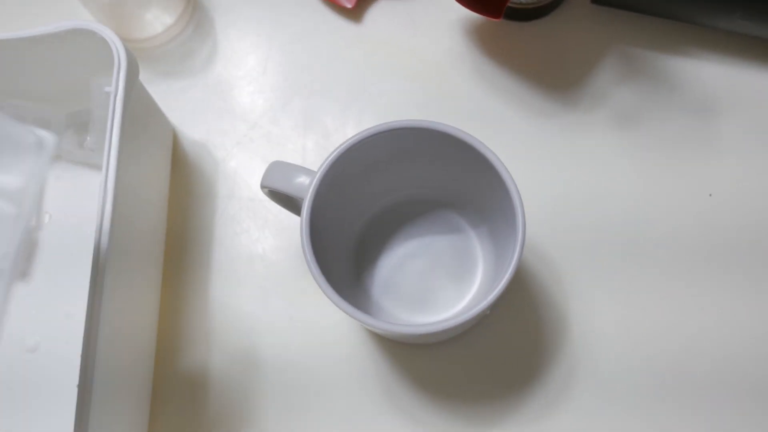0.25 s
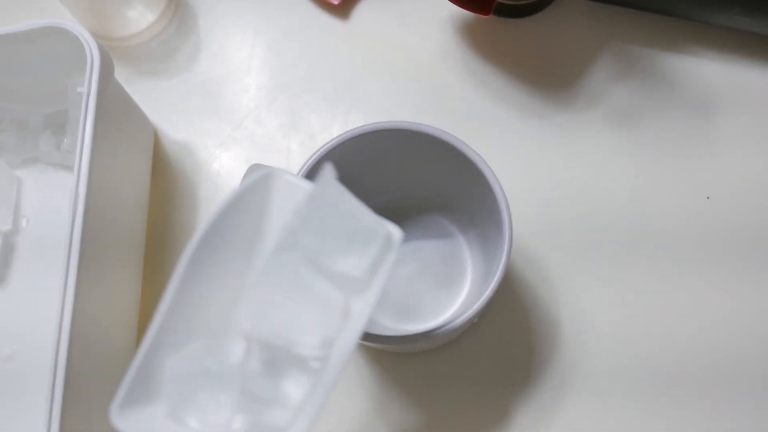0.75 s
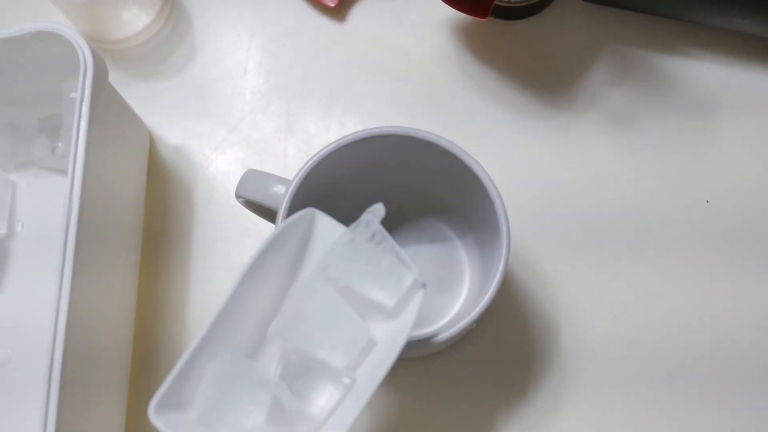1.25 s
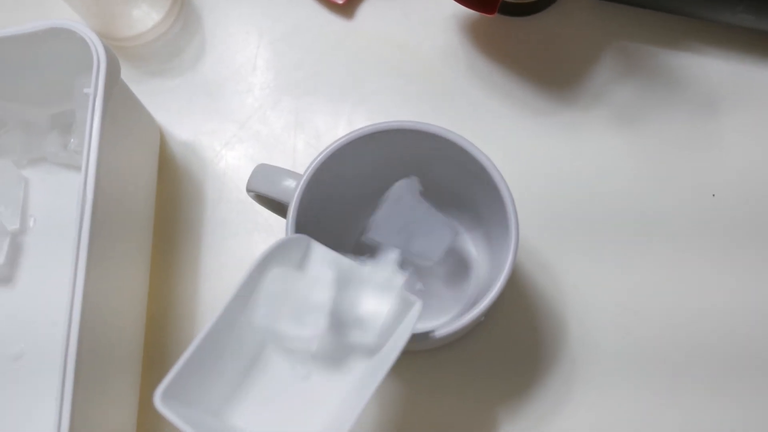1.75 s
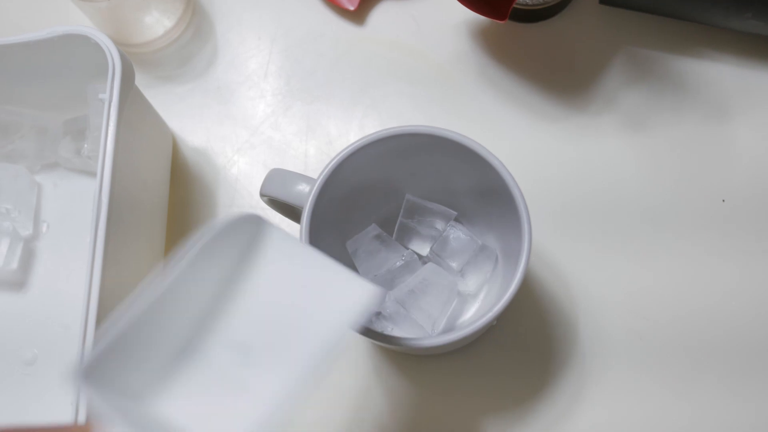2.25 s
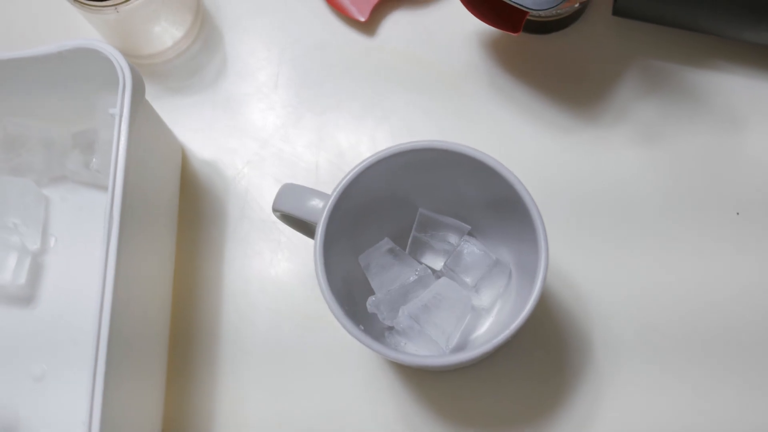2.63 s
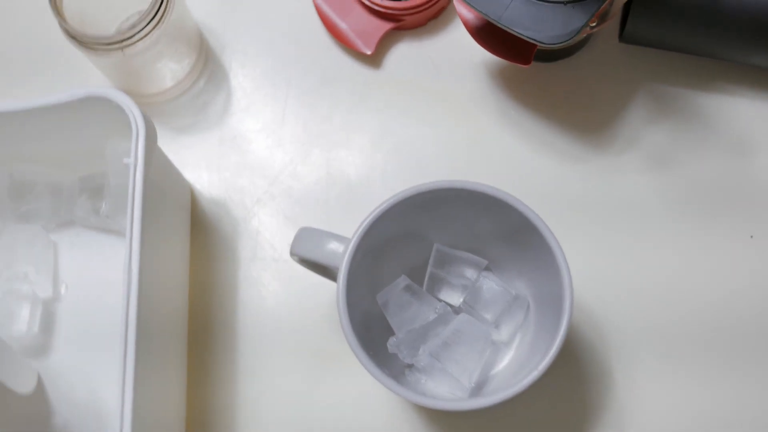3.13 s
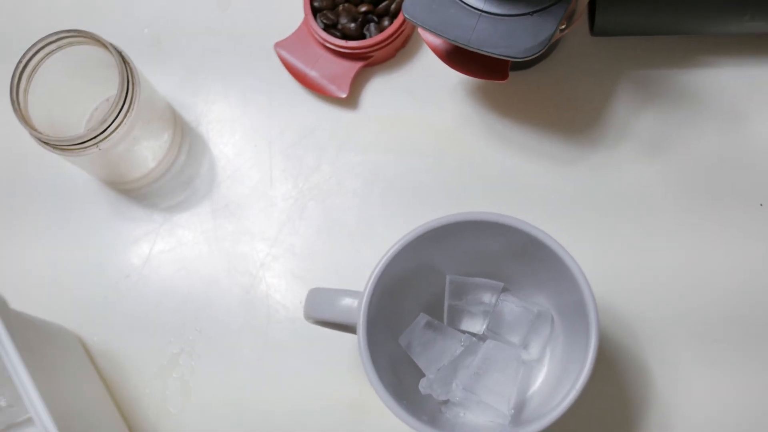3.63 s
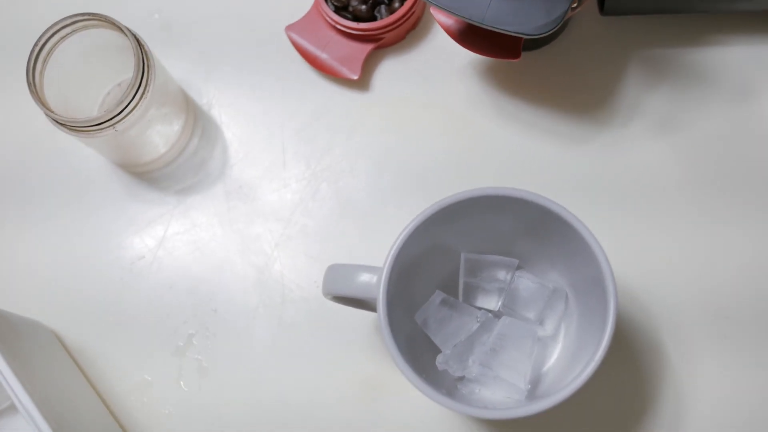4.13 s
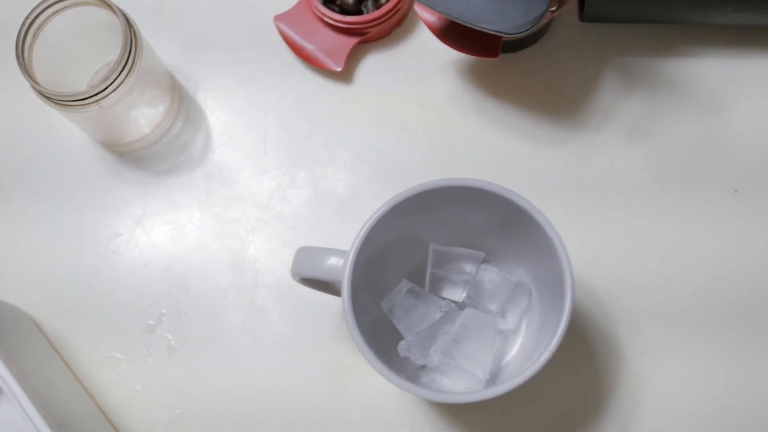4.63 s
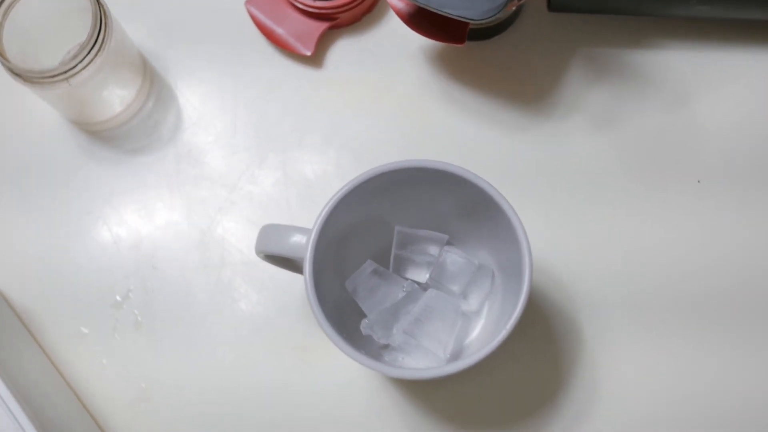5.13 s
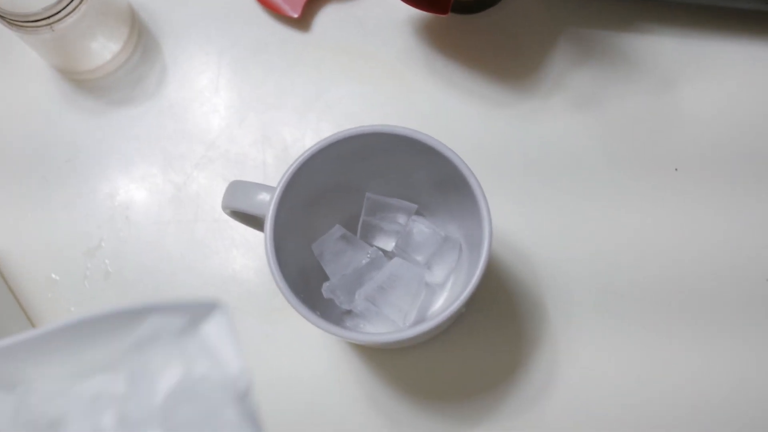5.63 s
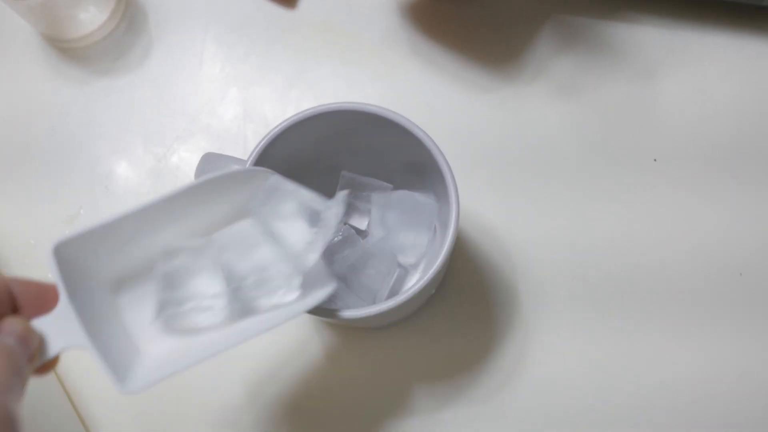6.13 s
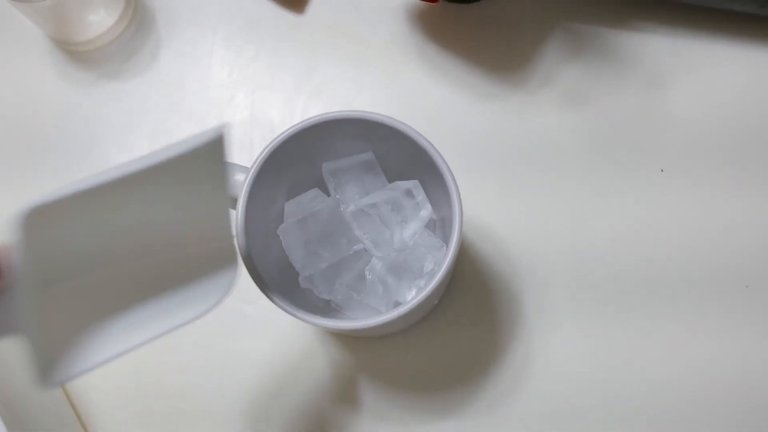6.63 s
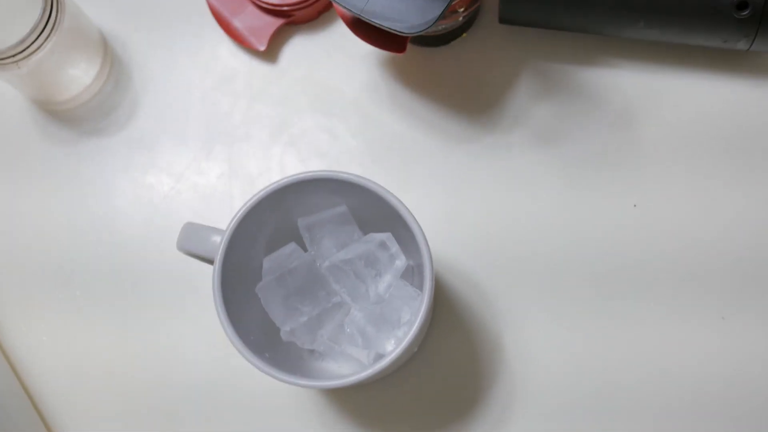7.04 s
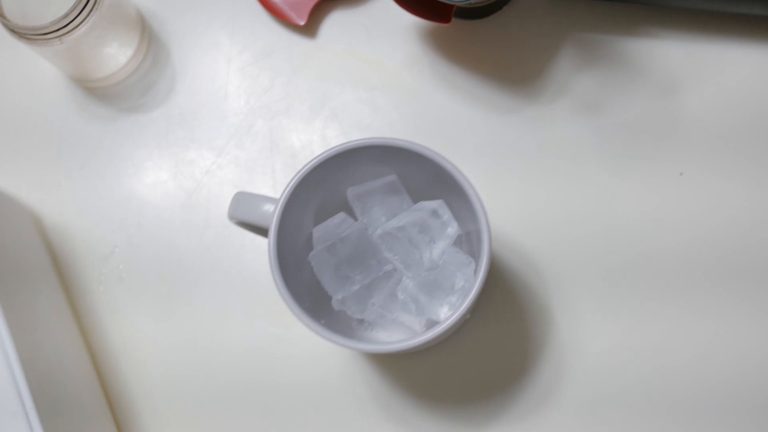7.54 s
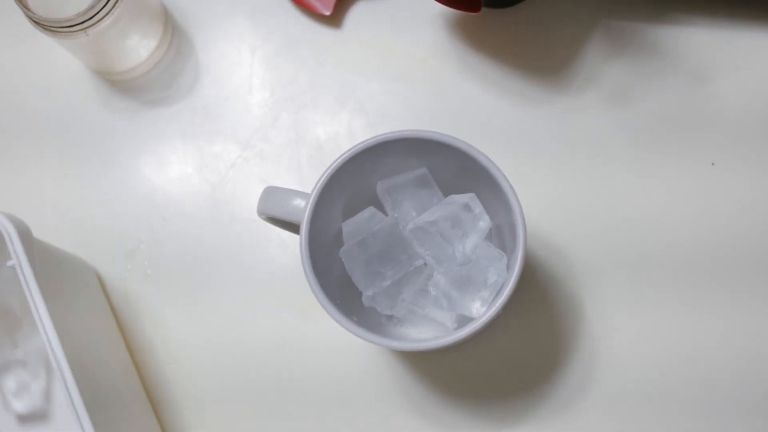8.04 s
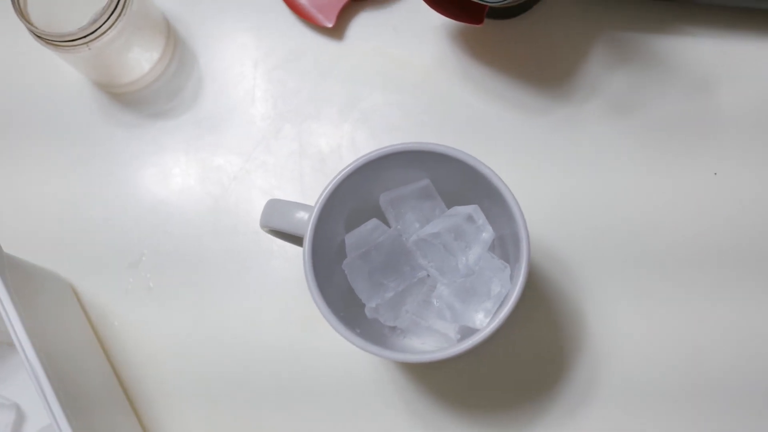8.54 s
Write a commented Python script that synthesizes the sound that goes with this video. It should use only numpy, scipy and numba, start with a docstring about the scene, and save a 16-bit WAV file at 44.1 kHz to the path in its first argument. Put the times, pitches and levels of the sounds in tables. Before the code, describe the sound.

Hard ice cubes knock and ring against a ceramic mug in two short bursts, separated by hollow, crunchy rummaging in a plastic ice bin. The plastic scoop grinds, drags out and drops back with blunt clacks and a few low counter thumps. Recorded close in stereo in a small, lightly echoing kitchen, with steady low background noise; it ends amid renewed digging.

```python
"""Ice cubes knock, tumble and slide in a plastic bin as a plastic scoop digs them out, twice, on a kitchen counter.
Each knock is bursts of noise with short tones; moving ice is noise and thousands of tiny rings.
Cubes tipped into a ceramic mug make it ring in many damped sines. The scoop drones, drags hollowly and lands.
Behind them are low thumps, a faint room echo, a low-mid murmur and the steady noise and rumble of the kitchen."""
import sys
import numpy as np
from scipy import signal
from scipy.fft import rfft, irfft, next_fast_len
from scipy.io import wavfile
from scipy.ndimage import uniform_filter1d
from numba import njit

SR = 44100
rng = np.random.default_rng(int(sys.argv[2]) if len(sys.argv) > 2 else 0)


def dump(signal):
    """Clip the signal to [-1, 1] and save it as 16-bit WAV at the path in sys.argv[1]."""
    limited = np.clip(np.atleast_2d(signal).T, -1, 1)
    pcm = np.round(limited * 32767).astype(np.int16)
    wavfile.write(sys.argv[1], SR, pcm)


N = 387198

# colour of the hiss of wet ice: f/Hz, relative level/dB
HISS_COLOUR = [(1470, -11.5), (2500, -7.5), (3310, -7), (4440, -6), (5110, -6.5), (7890, -5.5),
               (10100, -1.5), (14600, -15.5), (15600, -45), (16000, -47)]
# low rumble through counter and hand, and a faint steady low-mid murmur, rising at the start:
# t/s, rumble/dB, murmur/dB
RUMBLE_AND_MURMUR = [(0.0, -88, -96), (.3, -84, -74.5), (2.03, -77.5, -72.5), (3.84, -74, -70),
                     (5.11, -74.5, -82), (5.5, -70, -68), (5.89, -73, -69), (7.46, -70.5, -68.5),
                     (8.78, -83, -65)]
BIN_PAN_DB = 2  # the bin stands left


def undb(db):
    """Turn decibels into a plain gain."""
    return 10 ** (np.asarray(db) / 20)


def unit(x):
    """Scale a sound to rms 1."""
    return x / np.sqrt(np.mean(x ** 2))


def noise(spectrum):
    """Noise of rms 1 coloured by points of f/Hz, level/dB."""
    hz, db = np.transpose(spectrum)
    size = next_fast_len(N)
    f = np.maximum(np.fft.rfftfreq(size, 1 / SR), 1)
    white = rfft(rng.standard_normal(size))
    colour = undb(np.interp(np.log(f), np.log(hz), db))
    return unit(irfft(white * colour, size)[:N])


def band(x, lo_hz, hi_hz):
    """Keep mainly what lies between two frequencies."""
    return signal.sosfilt(signal.butter(2, [lo_hz, hi_hz], "bandpass", fs=SR, output="sos"), x)


def walk(rate):
    """Wandering level: random values held 1 / rate seconds, then smoothed twice; spread near 1."""
    k = int(SR / rate)
    steps = np.repeat(rng.standard_normal(N // k + 1), k)
    return 1.76 * uniform_filter1d(uniform_filter1d(steps, k), k)[:N]


def along(table):
    """Columns of a curve, sample by sample; the first column is time."""
    s, *columns = np.transpose(table)
    return [np.interp(np.arange(N) / SR, s, column) for column in columns]


def pair(pan_db):
    """Left and right gains; positive leans left."""
    return undb(np.array([pan_db, -pan_db]) / 2)


@njit
def rings(count, s, hz, t60, gains, phase, rate):
    """Damped sines in two channels; at 0 Hz and a quarter turn of phase they are bare decays."""
    out = np.zeros((2, count))
    for k in range(len(s)):
        # one turn and one small loss per sample
        p = np.exp(2j * np.pi * hz[k] / rate - np.log(1000) / (t60[k] * rate))
        z, start = np.exp(1j * phase[k]), int(s[k] * rate)
        for i in range(start, min(count, start + int(t60[k] * rate))):
            out[0, i] += gains[0, k] * z.imag
            out[1, i] += gains[1, k] * z.imag
            z *= p
    return out


def swells(s, hz, t60, gains, phase, rise_s):
    """Damped sines that swell in: a faster-dying copy is taken away from each."""
    def twice(first, second):
        return np.concatenate([first, second])
    short = np.minimum(rise_s, t60 / 2)
    both_gains = np.hstack([gains, -gains])
    return rings(N, twice(s, s), twice(hz, hz), twice(t60, short), both_gains, twice(phase, phase), 1. * SR)


def fades(s, db, t60, pan_db, rise_s=1e-4):
    """Envelope of blows: a quick rise, then a decay, made of two bare decays."""
    def twice(first, second):
        return np.concatenate([first, second])
    gains = undb(db) * pair(pan_db)
    quarter_turn = np.full(2 * len(s), np.pi / 2)
    return rings(N, twice(s, s), twice(0 * s, 0 * s), twice(t60, rise_s + 0 * s),
                 np.hstack([gains, -gains]), quarter_turn, 1. * SR)


def jostle(count, lo_hz, hi_hz, cycles, scatter_db):
    """Many small random knocks, each a short ring at its own pitch and place; rms 1."""
    u = rng.random((count, 5)).T
    hz = lo_hz * (hi_hz / lo_hz) ** u[1]
    strength = np.minimum(-np.log(1 - u[2]), 3)  # mostly weak, a few strong
    gains = undb(scatter_db * strength) * pair(5 * (u[3] - .5))
    return unit(rings(N, u[0] * N / SR, hz, cycles / hz, gains, 2 * np.pi * u[4], 1. * SR))


@njit
def walls(x, lags, gain, damp):
    """Room echo: eight delay lines that feed each other, duller on every round."""
    line, soft, out = np.zeros((8, 4096)), np.zeros(8), np.zeros((2, len(x)))
    for i in range(len(x)):
        total = 0.
        for k in range(8):
            soft[k] += (1 - damp) * (gain[k] * line[k, (i - lags[k]) & 4095] - soft[k])
            total += soft[k]
            out[k % 2, i] += soft[k]
        for k in range(8):
            line[k, i & 4095] = x[i] + soft[k] - total / 4
    return out


def over_mug(s):
    """True while the scoop is over the mug."""
    # visits to the mug: start/s, end/s
    visits = [(1.3, 2.3), (5.95, 6.7)]
    return sum((s > start) & (s < end) for start, end in visits) > 0


def bin_body():
    """Noise through the resonances of the bin walls and the air in it; rms 1."""
    # resonances: f/Hz, width/Hz, level/dB
    resonances = [(362.4, 90, 3.5), (525.5, 47, 0), (774, 246, 4.5), (1056, 260, 4), (1327, 225, 4.5),
                  (1590, 200, 2)]
    x = rng.standard_normal(N)
    total = 0
    for k, (hz, width, db) in enumerate(resonances):
        # neighbours have opposite sign
        total = total + (-1) ** k * undb(db) * unit(band(x, hz - width / 2, hz + width / 2))
    return unit(total)


def kitchen():
    """Steady noise of air and appliances, and a low rumble, partly alike in both channels."""
    # colour of the kitchen: f/Hz, relative level/dB
    air_colour = [(15, -44), (25, -15), (256, -0.5), (607, -10), (887, -3), (1260, -4.5), (1650, -19),
                  (1940, -13), (3620, -18.5), (10100, -20), (12500, -25), (16000, -41)]
    apart = np.array([[1], [-1]])
    air_gain = undb(-77 + 0.97 * walk(1.76))
    air = air_gain * (noise(air_colour) + 0.88 * noise(air_colour) * apart)
    mid, side = (unit(band(rng.standard_normal(N), 97, 317)) for _ in range(2))
    rumble_gain = undb(along(RUMBLE_AND_MURMUR)[0])
    return air + rumble_gain * (0.75 * mid + .5 * side * apart)


def counter():
    """A few heavy blows shake the counter: each is a short low tone that swells and dies."""
    # blows: t/s, level/dB, f/Hz
    thumps = [(1.823, -55, 237), (2.029, -63, 260), (2.626, -50.5, 253), (4.733, -58, 166), (6.2, -63, 94),
              (7.458, -63, 196), (7.719, -70, 256), (8.11, -51, 270)]
    s, db, hz = np.transpose(thumps)
    return swells(s, hz, 0.13 + 0 * s, undb(db) * pair(0 * s), 0 * s, .004)


def hollow():
    """The scoop is dragged out: friction flutters in two resonances of the air inside it."""
    # loudness of the drag before flutter: t/s, level/dB
    drag_curve = [(4.761, -57), (4.86, -68), (4.934, -65.5), (5.06, -67), (5.14, -87)]
    s, db = np.transpose(drag_curve)
    drag_db = np.interp(np.arange(N) / SR, s, db, left=-120, right=-120)
    gain = undb(drag_db + 4.6 * walk(45))
    x = rng.standard_normal(N)
    air = unit(band(x, 646, 775)) + .5 * unit(band(x, 346, 375))
    return gain * air * pair(np.full(1, BIN_PAN_DB))


def scoop():
    """The empty scoop lands in the bin: a blunt double snap, then the plastic shudders in its resonances."""
    # landings: t/s, low resonance level/dB, high resonance level/dB
    landings = [(2.6272, -48.5, -57), (6.9306, -60, -50), (7.1897, -57, -62)]
    # resonances of the scoop: f/Hz, width/Hz, added level/dB
    plastic = [(403, 160, -3), (1570, 130, -5.5), (3100, 190, -2)]
    s, low_db, high_db = np.transpose(landings)
    out = 0
    for hz, width, db in plastic:
        shudder = unit(band(rng.standard_normal(N), hz - width / 2, hz + width / 2))
        landing_db = low_db if hz < 1000 else high_db
        out = out + shudder * fades(s, landing_db + db, 0.32 + 0 * s, 2.1 + 0 * s, .002)
    snap_gains = undb(high_db + 26.5) * pair(3.1 + 0 * s)
    for late_s in (.001, .0035):  # heel, then lip
        out = out + rings(N, s + late_s, 1300 + 0 * s, 0.002 + 0 * s, snap_gains, 0 * s, 1. * SR)
    return out


def scoop_drones():
    """Plastic resonances of the scoop drone roughly, as it grinds through ice or tips over the mug."""
    # drones: start t/s, length/s, f/Hz, level/dB
    drones = [(1.705, 0.033, 3240, -49), (1.707, .022, 2190, -52), (3.29, 0.033, 1490, -50),
              (3.619, 0.015, 557, -45.5), (3.696, 0.053, 1470, -46), (3.714, 0.039, 890, -45),
              (3.786, 0.043, 1560, -44.5), (3.84, 0.02, 840, -48), (3.948, 0.035, 920, -48.5),
              (4.637, 0.035, 1580, -53), (7.79, 0.17, 1434, -50), (7.88, 0.029, 714, -48),
              (8.102, 0.033, 1440, -48), (8.234, 0.054, 1420, -50.5), (8.0, .07, 1400, -55),
              (8.329, .04, 750, -56.5)]
    width_hz, fall_db_per_s = 250, 600
    out = np.zeros(N)
    rough = rng.standard_normal(N) * undb(2.3 * walk(90))
    for start, length, hz, db in drones:
        span = slice(int((start - .02) * SR), int((start + length + .08) * SR))
        t = np.arange(span.start, span.stop) / SR
        before, after = np.maximum(start - t, 0), np.maximum(t - start - length, 0)
        shape_db = -fall_db_per_s * (3 * before + after)  # rises three times as fast as it falls
        drone = unit(band(rough[span], hz - width_hz / 2, hz + width_hz / 2))
        out[span] += undb(db + shape_db) * drone
    return out * pair(np.full(1, 1.7 * BIN_PAN_DB))


def mug():
    """Cubes strike the mug: its modes ring as damped sines; the next cube to touch takes part of the ring away."""
    # strikes: t/s, oval level/dB, rim level/dB, wall level/dB, base level/dB, lip level/dB,
    # angle from the handle/degrees, share of free ring time that resting ice leaves the upper modes/ratio
    strikes = [(1.8254, -61, -66, -55, -30.5, -40, 14, 0.24), (1.8644, -52, -59, -57, -41, -53, 16, 1.1),
               (1.9094, -50, -60, -65, -30.5, -60, 17, 0.84), (1.9689, -52, -60, -45.5, -45, -66, 29, 1.1),
               (1.9844, -54, -69, -43, -33.5, -62, 5, 0.39), (2.0234, -48.5, -57, -65, -31, -70, 24, 0.42),
               (2.0632, -56, -55, -56, -35, -66, 36, 0.73), (2.1271, -54, -63, -66, -52, -72, 11, 0.47),
               (6.1044, -52, -55, -60, -56, -49, 13, .6), (6.1449, -42.5, -37.5, -51, -60, -60, 22, 0.33),
               (6.2144, -41, -41, -56, -61, -63, 39, .4), (6.2677, -49, -54, -54, -53, -60, 23, 0.88),
               (6.3114, -44, -45.5, -56, -44.5, -56, 26, 0.95),
               (6.3944, -44.5, -43, -62, -33, -60, 44, 0.3), (6.4542, -49, -58, -74, -57, -62, 41, .5),
               (6.54, -45, -43.5, -74, -64, -65, 35, .78), (6.554, -53, -48, -70, -61, -54, 15, 0.86)]
    # modes: family (0 lower oval, 1 upper oval, 2 rim, 3 wall, 4 base, 5 lip), f/Hz, added level/dB, free t60/s
    modes = [(0, 1992, -3, .9), (1, 2129, -2, .6), (0, 1000, -8, .45), (2, 3720, -14, .25),
             (2, 4994, -2, .42), (3, 4780, -6, .35), (2, 9440, -10, .35), (3, 7058, -10, .3),
             (4, 11270, -22, .4), (3, 7462, 0, .4), (3, 6252, -4, .2), (4, 10824, -6, .26),
             (4, 10977, -10, .45), (4, 13020, -25, .55), (4, 13835, -26, .55), (4, 14180, -27, .25),
             (4, 14430, -30, .45), (4, 14650, -28, .35), (4, 11940, -21, .35), (4, 12035, -18, .2),
             (4, 12330, -21, .3), (5, 11684, 0, .45)]
    s, oval_db, rim_db, wall_db, base_db, lip_db, degrees, share = np.transpose(strikes)
    # the second scoop lands in a half-full mug, which damps the oval mode
    load = np.where(s > 4, .75, 1)
    # the handle splits the oval mode in two; the place of the blow shares it out
    angle = np.radians(2 * degrees)
    lower_db, upper_db = (oval_db + 20 * np.log10(abs(f(angle)) + 0.0092) for f in (np.cos, np.sin))
    family_db = [lower_db, upper_db, rim_db, wall_db, base_db, lip_db]

    # shifting cubes brush the wall and make each ring waver, until they come to rest
    stirred = np.minimum(fades(s, 10 + 0 * s, .3 + 0 * s, 0 * s)[0], 1)
    waver = [undb((1 if k > 1 else .6) * 3 * stirred * walk(45)) for k in range(len(family_db))]
    gap = np.diff(s)
    steps = (s[1:] * SR).astype(int) - (s[:-1] * SR).astype(int)
    out = 0
    for family, hz, db, t60 in modes:
        family = int(family)
        luck = rng.random((len(s), 3)).T
        kept = .7 if family < 2 or hz > 12500 else .45  # a touch takes less from the slow oval swing
        # each ring gets a random level and left-right balance
        gains = undb(family_db[family] + db + 4 * (luck[0] - .5)) * pair(1.1 + 12 * (luck[2] - .5))
        if family < 2:
            ring_s = t60 * 0.8 * load  # ice inside shortens the oval's ring
        else:
            ring_s = t60 * np.clip(share, .1, 1.5) ** (.4 if hz > 12500 else 1)
        phase = 2 * np.pi * luck[1]
        hz = hz * (1 + .004 * (luck[0] - .5))  # each ring's pitch scatters a little at random
        ring = rings(N, s, hz, ring_s, gains, phase, 1. * SR)
        # from the next strike on, subtract a share of the same ring, still in step with it
        taken = (1 - kept) * gains[:, :-1] * undb(-60 * gap / ring_s[:-1])
        later_phase = phase[:-1] + 2 * np.pi * hz[:-1] * steps / SR
        ring = ring - rings(N, s[1:], hz[:-1], ring_s[:-1], taken, later_phase, 1. * SR)
        out = out + waver[family] * ring
    return out


def shuffles():
    """Shuffles of the scoop set cubes moving: gains of sliding, rattling and tumbling rise, hold and fall."""
    # shuffles: start t/s, length/s, sliding level/dB, clatter level/dB
    moves = [(0.157, 0.1, -65, -74.5), (0.315, 0.063, -55.5, -73), (0.477, 0.068, -59, -68.5),
             (0.613, 0.062, -72, -77), (0.754, 0.15, -72.5, -79), (1.127, 0.033, -66, -76),
             (1.37, 0.16, -71, -76.5), (1.583, 0.022, -59, -69), (1.705, 0.019, -49.5, -50),
             (1.812, 0.094, -56, -56), (1.978, 0.093, -55, -57.5), (2.272, 0.039, -62, -86),
             (2.408, 0.042, -64, -89), (2.616, 0.009, -50.5, -63), (2.77, 0.22, -68, -76),
             (2.883, 0.21, -57.5, -65.5), (3.217, 0.2, -52, -53.5), (3.604, 0.043, -49.5, -52),
             (3.695, .3, -48, -50), (4.198, 0.11, -46.5, -57), (4.38, 0.068, -50, -53.5),
             (4.564, 0.24, -53, -58), (4.9, 0.16, -60.5, -67), (5.127, 0.12, -55.5, -68.5),
             (5.368, 0.16, -66.5, -91), (5.588, 0.029, -61.5, -69), (5.692, 0.26, -59, -71.5),
             (6.089, 0.43, -48, -54.5), (6.866, 0.21, -64, -68.5), (7.089, 0.05, -57.5, -80),
             (7.283, 0.18, -57.5, -63.5), (7.437, 0.063, -48.5, -50.5), (7.603, 0.38, -48, -50),
             (8.059, 0.067, -48.5, -49), (8.217, 0.078, -50, -50), (8.395, 0.16, -56, -58.5),
             (8.616, 0.028, -50, -52), (8.71, 0.049, -63, -67)]
    rise_db_per_s, fall_db_per_s = 472, 96
    t, power = np.arange(0, N, 64) / SR, 0  # a coarse clock, filled in at the end
    for start, length, slide_db, clatter_db in moves:
        before, after = np.maximum(start - t, 0), np.maximum(t - start - length, 0)
        shape_db = -rise_db_per_s * before - fall_db_per_s * after
        tumble_db = clatter_db + (-0.5 if over_mug(start) else 2)  # how much clatter shakes the plastic
        # wet faces slide on softly after a shuffle
        linger_db = np.where(t > start, -15 - 57 * after, -200)
        db = [slide_db + np.maximum(shape_db, linger_db), clatter_db + shape_db, tumble_db + shape_db]
        power = power + undb(db) ** 2
    return [np.interp(np.arange(N) / SR, t, np.sqrt(p)) for p in power]


def moving_ice():
    """Tumbling shakes the bin over a faint murmur, cubes rattle on each other, wet faces hiss and crackle."""
    sliding, rattling, tumbling = shuffles()
    murmur_gain = undb(along(RUMBLE_AND_MURMUR)[1])
    tumbling = np.hypot(tumbling, murmur_gain)
    surge = walk(25)

    bumps = jostle(count=2500, lo_hz=448.6, hi_hz=1785, cycles=31, scatter_db=4.5)
    tumble = 0.39 * bin_body() * undb(3.67 * surge) + 0.37 * bumps

    scrape = unit(band(rng.standard_normal(N), 2080, 3840)) * undb(3.54 * surge)
    grains = jostle(count=6000, lo_hz=1740, hi_hz=5400, cycles=9.3, scatter_db=3.5)
    rattle = .5 * scrape + .7 * grains

    mid, side = noise(HISS_COLOUR), noise(HISS_COLOUR)
    wide = 0.81 * mid + 0.5 * side * np.array([[1], [-1]])
    crackle = jostle(count=2500, lo_hz=4520, hi_hz=12800, cycles=56, scatter_db=4.5)
    hiss = wide * undb(2.0 * surge + 0.53 * walk(60)) + 0.24 * crackle
    bin_side = pair(np.full(1, BIN_PAN_DB))
    return bin_side * (tumbling * tumble + rattling * rattle) + sliding * hiss


def knocks():
    """Each knock: a crack, a short pitch, a thud, a fainter noisy tail; crisp at the mug, soft and long in the bin."""
    # single knocks, levels before the offsets below: t/s, peak level/dB, clack f/Hz,
    # thud level/dB, thud f/Hz, tick level/dB
    knock_table = [(0.091, -52.5, 1170, -72, 810, -58.5), (0.1491, -56, 4730, -78, 619, -74),
                   (0.3077, -50, 4970, -81, 832, -67), (1.0924, -71, 940, -65, 985, -86),
                   (1.3395, -30, 3400, -54.5, 483, -33.5), (1.575, -38, 2330, -57, 840, -49),
                   (1.6571, -36.5, 3320, -67, 778, -37.5), (1.6846, -31, 3030, -55, 910, -38),
                   (1.7087, -21, 2260, -52, 1120, -35), (1.7244, -28, 3250, -51, 660, -46),
                   (1.7508, -25, 3280, -54, 836, -24), (1.7911, -25.5, 3350, -51, 890, -46),
                   (1.797, -30, 2040, -55, 890, -52), (1.8254, -36, 856, -38.5, 670, -38),
                   (1.8392, -23.5, 3260, -55, 890, -35), (1.889, -22, 3110, -45, 855, -55),
                   (1.9088, -34, 1990, -45, 896, -47), (1.9296, -33, 2130, -50, 649, -53),
                   (1.9652, -29.5, 6160, -51.5, 324, -54), (1.98, -26, 2600, -36.5, 744, -51),
                   (2.0226, -32, 4750, -51, 630, -47), (2.037, -19.5, 6280, -59, 716, -29.5),
                   (2.0484, -26, 3650, -47, 990, -47), (2.0637, -24.5, 3000, -46, 1100, -40),
                   (2.1271, -33, 4540, -67, 1000, -59), (2.599, -48, 6400, -71, 904, -53),
                   (2.6274, -26, 2520, -42.5, 394, -37.5), (2.9407, -46, 914, -55.5, 714, -49),
                   (3.0792, -32, 1476, -54.5, 398, -54), (3.097, -44, 2520, -54, 386, -60),
                   (3.1472, -27.5, 1310, -41.5, 1010, -34.5), (3.214, -50, 2950, -61, 615, -49),
                   (3.2249, -30.5, 4600, -47.5, 423, -33), (3.26, -34.5, 1470, -49, 490, -40.5),
                   (3.307, -28, 2280, -61, 696, -32.5), (3.316, -31, 1450, -49, 900, -60),
                   (3.3293, -29, 1510, -44, 545, -53), (3.3855, -27.5, 1386, -48, 845, -40.5),
                   (3.5877, -64, 1520, -49.5, 855, -41.5), (3.6072, -36, 1400, -38.5, 550, -43),
                   (3.703, -26, 1600, -36, 1000, -39.5), (3.7244, -32, 1036, -48, 1000, -44),
                   (3.7384, -27, 6240, -42, 506, -38), (3.7504, -44, 1530, -50, 790, -61),
                   (3.7838, -39, 1630, -37.5, 767, -60), (3.8097, -26.5, 1620, -48, 800, -40),
                   (3.857, -38, 1100, -52, 832, -37.5), (3.8879, -30.5, 1640, -43, 810, -58),
                   (3.925, -28.5, 1486, -47, 1210, -41), (3.9639, -26.5, 1297, -43, 820, -51),
                   (3.9934, -33, 890, -64, 904, -60), (4.0385, -31, 1474, -63, 1100, -64),
                   (4.0652, -33, 1660, -47, 990, -65), (4.0936, -30, 2065, -49, 797, -42.5),
                   (4.373, -37, 4500, -55, 834, -46), (4.4049, -32.5, 1100, -41.5, 531, -59),
                   (4.4167, -30, 1580, -55, 560, -59), (4.441, -31, 4520, -66, 840, -33),
                   (4.529, -41, 1350, -58, 880, -58), (4.5534, -37, 1325, -62, 890, -46),
                   (4.5775, -29, 3310, -47, 805, -37.5), (4.6139, -31, 1530, -53, 880, -37),
                   (4.6424, -29, 1635, -64, 1200, -38), (4.725, -57, 1330, -47, 570, -66),
                   (4.7335, -27.5, 1320, -40.5, 518, -32), (4.7835, -32.5, 1426, -49, 720, -47),
                   (4.9033, -35, 1340, -44.5, 716, -43.5), (5.1282, -49, 5000, -66, 426, -56),
                   (5.1524, -45, 5160, -62, 770, -48), (5.2395, -46, 2630, -79, 791, -61),
                   (5.8578, -49, 6160, -66, 396, -48), (6.0197, -34.5, 3800, -55, 956, -38),
                   (6.0776, -43, 3980, -65, 1010, -57), (6.1066, -31.5, 2130, -39, 990, -48),
                   (6.1432, -27, 5100, -45, 1040, -44), (6.2008, -18.5, 2550, -67, 1200, -29),
                   (6.2128, -26, 2190, -66, 988, -29), (6.265, -30, 5140, -65, 690, -43),
                   (6.3111, -31, 2150, -49, 690, -45), (6.299, -32, 3120, -55, 900, -33),
                   (6.3355, -27.5, 2740, -45, 990, -50), (6.349, -42, 6200, -70, 900, -43),
                   (6.3936, -18, 5530, -66, 1110, -38), (6.4, -32, 4340, -64, 1100, -37),
                   (6.553, -37, 3020, -70, 996, -57), (6.849, -55, 1530, -61, 369, -50.5),
                   (6.9316, -26, 3080, -37.5, 1010, -47.5), (7.0896, -58, 1970, -67, 1010, -48.5),
                   (7.1892, -33.5, 1526, -47.5, 325, -52), (7.218, -43, 1490, -56, 307, -60),
                   (7.3342, -33.5, 1045, -41.5, 547, -43), (7.3954, -44, 950, -42, 542, -43.5),
                   (7.439, -31, 3170, -57, 900, -52), (7.4447, -30, 1900, -41.5, 1000, -45),
                   (7.4635, -27.5, 1350, -57, 549, -36), (7.5168, -29, 3500, -46, 1200, -56),
                   (7.5892, -35, 3610, -60, 797, -42), (7.6077, -27.5, 1322, -44.5, 520, -34),
                   (7.622, -37, 3600, -63, 900, -56), (7.651, -39, 1300, -63, 1000, -51),
                   (7.689, -56, 1320, -52, 413, -59), (7.7119, -27.5, 1250, -46, 1060, -56),
                   (7.727, -30, 1800, -51, 495, -37), (7.7777, -29, 1450, -43, 1000, -51),
                   (7.8312, -31, 1455, -50, 1010, -34.5), (7.914, -30.5, 3540, -45, 1200, -39.5),
                   (7.927, -30.5, 1436, -56, 1000, -45), (7.9995, -36, 1320, -49, 799, -58),
                   (8.053, -34.5, 1520, -55, 900, -46), (8.0862, -30, 1450, -41.5, 510, -41),
                   (8.111, -23, 1516, -46, 626, -57), (8.1412, -25, 3960, -52, 991, -59),
                   (8.1798, -33, 1370, -45, 790, -58), (8.2167, -24.5, 1310, -44, 540, -37.5),
                   (8.2405, -25.5, 3560, -54, 1000, -50), (8.2756, -29.5, 1253, -46, 525, -50),
                   (8.3235, -32.5, 1580, -43.5, 790, -56), (8.4709, -32, 1362, -41.5, 1210, -46.5),
                   (8.566, -33, 3140, -51, 1120, -47), (8.605, -34, 2800, -41.5, 548, -45),
                   (8.6218, -34, 1647, -45, 916, -43), (8.7041, -46, 2900, -58, 341, -48)]
    s, peak_db, clack_hz, thud_db, thud_hz, tick_db = np.transpose(knock_table)
    luck = rng.random((len(s), 4)).T
    at_mug = over_mug(s)

    def place(mug_value, bin_value):
        return np.where(at_mug, mug_value, bin_value)

    pan_db = place(1.5, 4.5) + 3 * (luck[3] - .5)
    sides = pair(pan_db)
    soft, tail_db, rise_s = place(.45, 1.3), place(25, 10.5), place(.001, .006)

    # thud: noise through the bin, plus a low tone
    thud = fades(s, thud_db - place(9, 3), 0.082 * soft, pan_db, rise_s) * bin_body()
    thud_t60 = np.minimum(36 / thud_hz, .09) * place(.65, 1)
    thud = thud + swells(s, thud_hz, thud_t60, undb(thud_db + 1.5) * sides, 0 * s, 1.33 * rise_s)

    clack = 0
    for lo_hz in (532, 1170, 1820, 3550):
        # the noise of the crack gathers in the octaves near its pitch; its rms lies far under its peak
        db = peak_db - 19.5 - 5 * abs(np.log2(clack_hz / (1.03 * lo_hz)))
        crack = fades(s, db + place(3.5, 2.3), 0.041 * soft, pan_db, rise_s / 2)
        tail_cut_db = tail_db + (4 if lo_hz > 3000 else 0)
        crack = crack + fades(s, db - tail_cut_db, place(.15, .41), pan_db, rise_s)
        clack = clack + crack * unit(band(rng.standard_normal(N), lo_hz, 2.01 * lo_hz))

    # two short tones give the pitch
    tone_t60 = place(.022, .085) * (1500 / clack_hz) ** place(.05, .8)
    for ratio, turn, under_db in ((1, luck[0], 13), (0.64 + 0.66 * luck[1], luck[2], 19)):
        tone_gains = undb(peak_db - under_db) * sides
        clack = clack + swells(s, ratio * clack_hz, tone_t60, tone_gains, 2 * np.pi * turn, 0.64 * rise_s)

    # knocks at the mug start with a hard snap; in the bin only clacks above 2600 Hz do
    snap_db = peak_db + place(-4.5, np.where(clack_hz > 2600, 1.5, -200))
    snap_hz = np.maximum(clack_hz, 2000)
    clack = clack + rings(N, s + 0.00101, snap_hz, 10.4 / snap_hz, undb(snap_db) * sides, 0 * s, 1. * SR)

    tick = fades(s, tick_db, 0.017 * soft, pan_db, 0.64 * rise_s)
    tick = tick + fades(s, tick_db - tail_db, 0.17 + 0 * s, pan_db, rise_s)
    return thud + clack + tick * band(noise(HISS_COLOUR), 1450, 10800)


def scene():
    """Add the near sounds, their room echo, the counter and the kitchen."""
    near = moving_ice() + knocks() + mug() + hollow() + scoop_drones() + scoop()
    # small things radiate no deep bass
    near = signal.sosfilt(signal.butter(3, 170, "highpass", fs=SR, output="sos"), near)
    lags = rng.integers(500, 2600, 8)  # samples
    round_gain = undb(-60 * lags / SR / 0.3)  # 0.3 s to fall 60 dB, before the dulling
    room = walls(near.mean(axis=0) + 1e-18, lags, round_gain, 0.84)
    return near + undb(-6) * room + counter() + kitchen()


def record(dry):
    """The right channel gets more treble than the left; both have a narrow notch and lose the very top."""
    top = signal.sosfiltfilt(signal.butter(2, 12000, "highpass", fs=SR, output="sos"), dry)
    tilted = dry + top * np.array([[-.3], [.3]])
    notched = signal.lfilter(*signal.iirnotch(7900, 45, SR), tilted)
    return signal.sosfilt(signal.ellip(8, .2, 70, 15700, fs=SR, output="sos"), notched)


dry = scene()
out = record(dry)
dump(out)
```